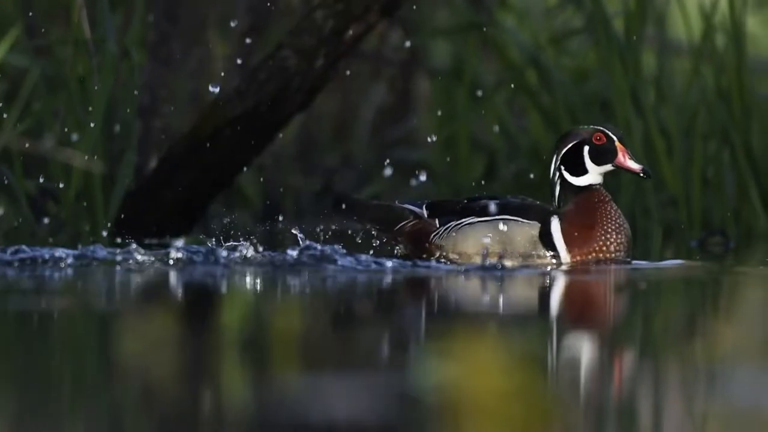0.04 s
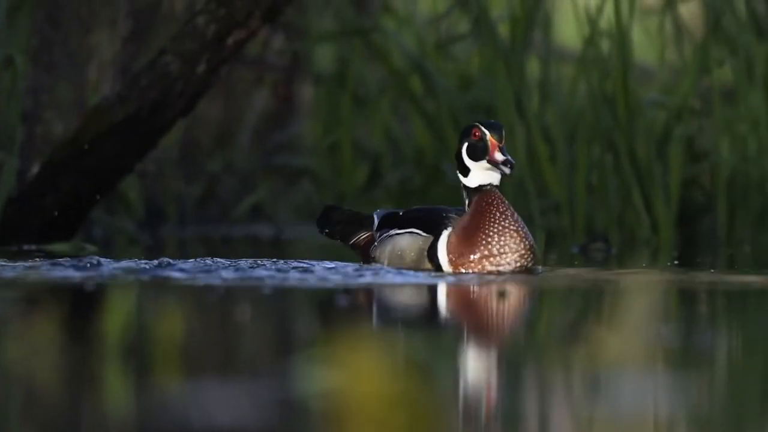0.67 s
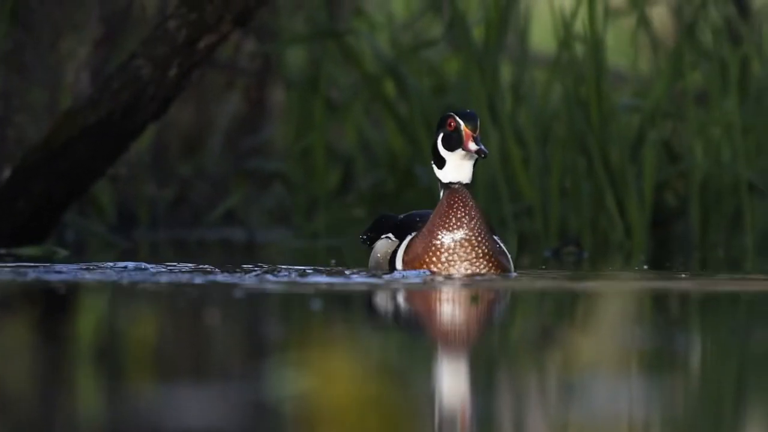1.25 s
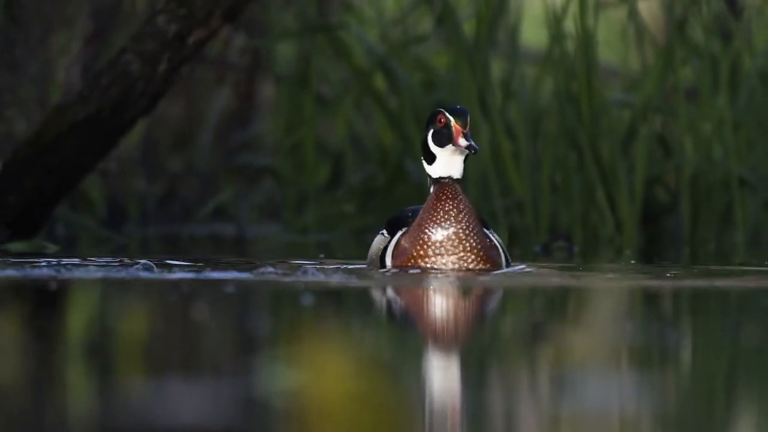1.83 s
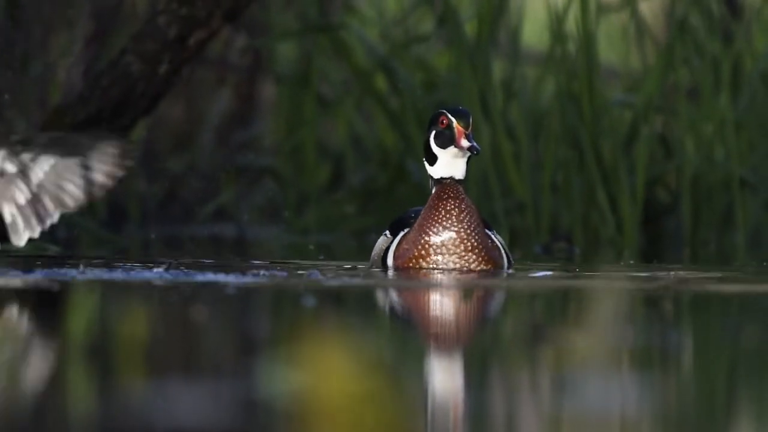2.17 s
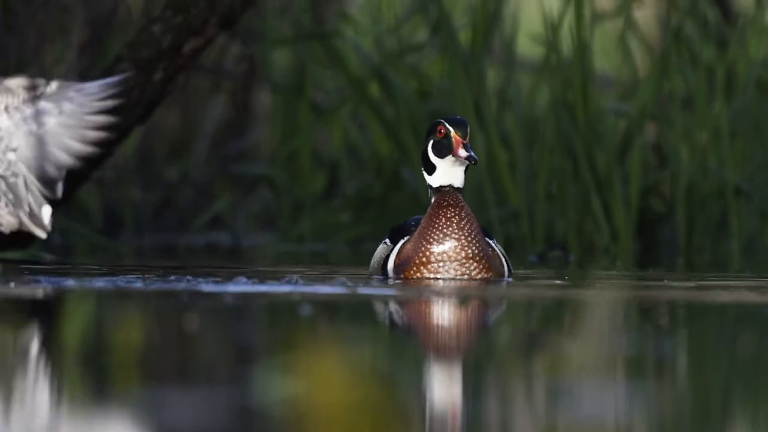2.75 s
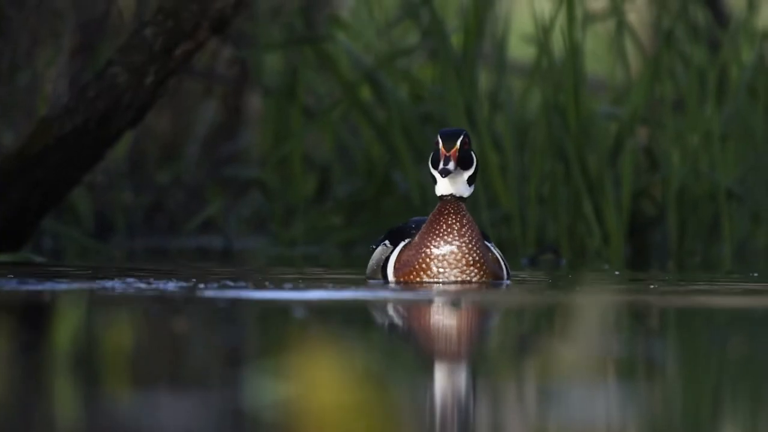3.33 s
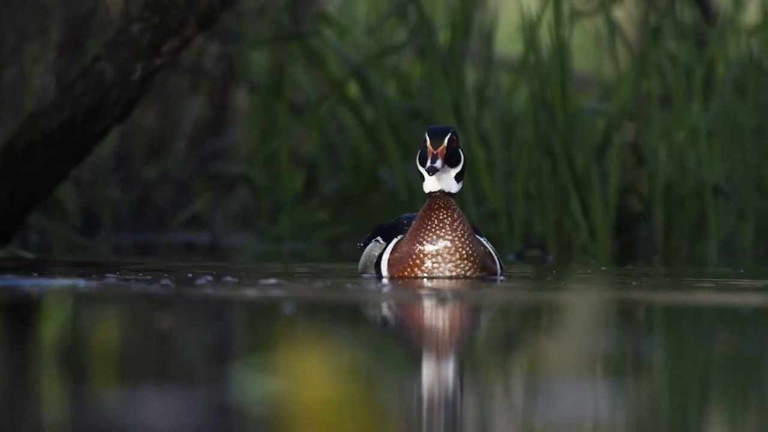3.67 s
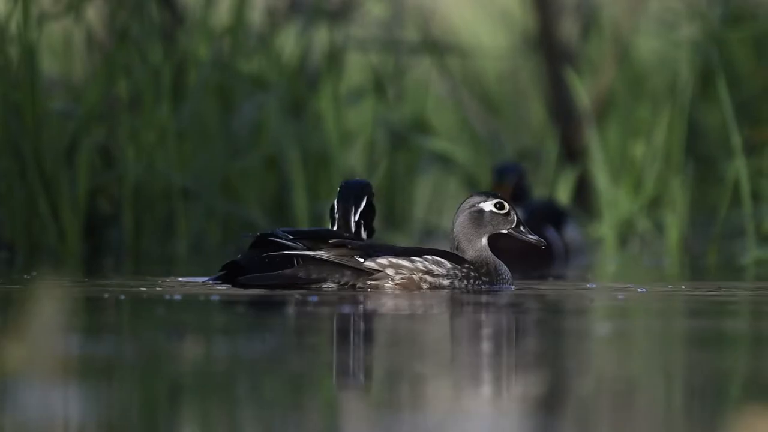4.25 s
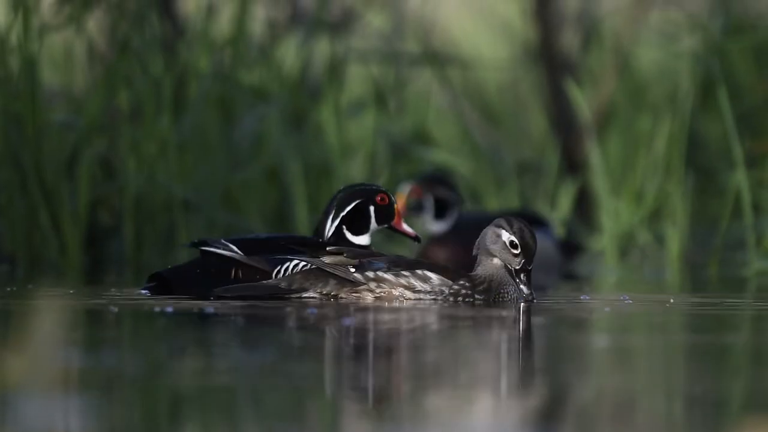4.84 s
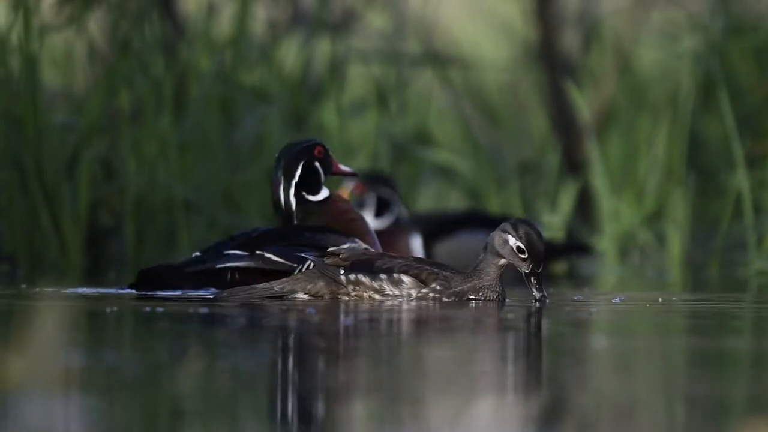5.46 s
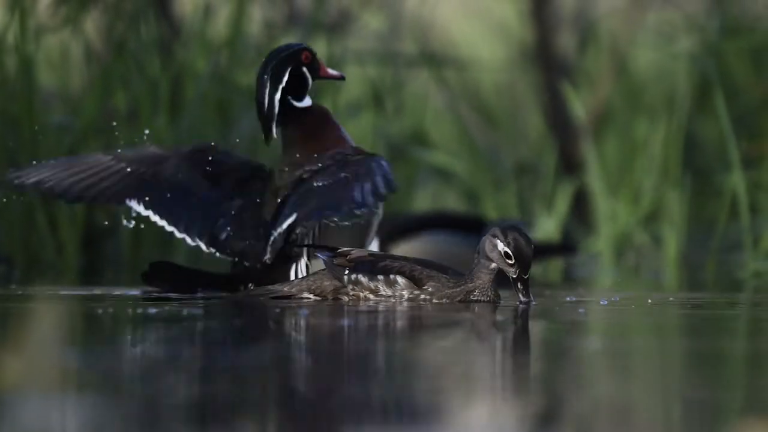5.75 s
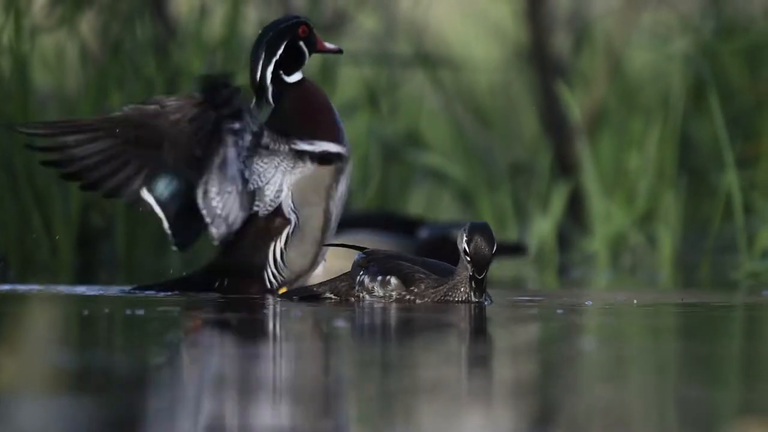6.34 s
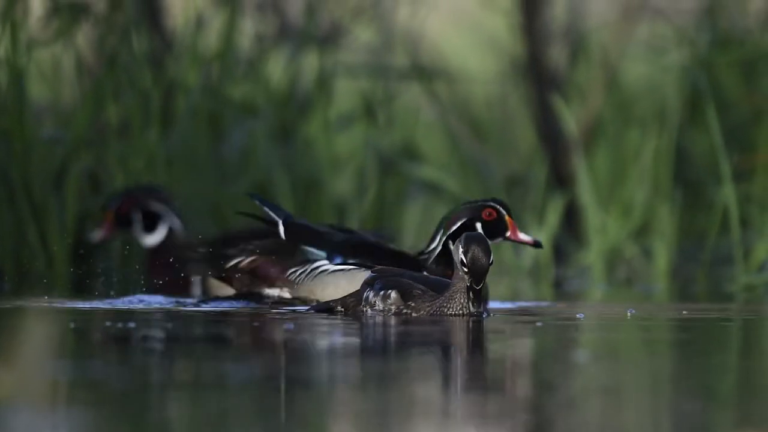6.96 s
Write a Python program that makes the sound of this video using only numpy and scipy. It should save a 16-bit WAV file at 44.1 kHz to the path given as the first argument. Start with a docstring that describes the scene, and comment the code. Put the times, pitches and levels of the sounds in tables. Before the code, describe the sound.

A blackbird whistles and trills harshly while ducks give thin whistles and hoarse clucks over a quiet pond's steady hush.

```python
"""A pond at the edge of a wood: steady hush, faint high recorder whine, trees echoing every call.
A blackbird opens with a whistled phrase and a harsh pulsed trill; drips and soft bumps sound on the
water. Wood ducks join with thin gliding whistles and hoarse clucks, far birds twitter. From 3.3 s the
blackbird repeats its phrase. From 4.6 s a small bird chips over a faint hum. At 7 s a second trill opens."""
import sys
import numpy as np
from scipy import signal
from scipy.fft import rfft, irfft, next_fast_len
from scipy.io import wavfile
from scipy.ndimage import map_coordinates

SR = 44100
rng = np.random.default_rng(int(sys.argv[2]) if len(sys.argv) > 2 else 0)


def generate_wav(signal):
    """Clip the signal to [-1, 1] and save it as 16-bit WAV at the path in sys.argv[1]."""
    frames = np.transpose(np.atleast_2d(signal))
    scaled = np.clip(frames, -1, 1) * 32767
    pcm = np.round(scaled).astype(np.int16)
    wavfile.write(sys.argv[1], SR, pcm)


N = 317520
TIME_S = np.arange(N) / SR

# distant low rush: f/Hz, relative level/dB
RUSH_SPECTRUM = [(15, -49), (25, -27), (43, -6.5), (90, -5), (119, -1), (156, -2.5), (236, -3.5),
                 (280, -7.5), (362, -7), (394, -7), (838, -7.5), (928, -4.5), (1500, -14.5), (1950, -35),
                 (3300, -120)]
# leaves, far birds, microphone hiss: f/Hz, relative level/dB
AIR_SPECTRUM = [(1200, -63), (1550, -5), (1820, -3.5), (1950, 3), (2250, 0), (2450, -4.5), (2700, 1),
                (3300, -5.5), (4500, -8), (6000, -12), (8000, -18.5), (11000, -22.5), (13000, -21),
                (15700, -28)]
# slow drift of that wash: t/s, relative level/dB
AIR_DRIFT = [(0.0, -50), (1.8, -52.5), (7.2, -51)]
# recorder whine: f/Hz, level/dB
WHINE_LINES = [(12021, -86), (12753, -87), (13566, -89), (15655, -54.5)]
# echo decay: f/Hz, T60/s
TREE_DECAY = [(200, .4), (2500, 0.77), (4000, 1), (6000, 0.55), (12000, 0.24)]
# low bumps: t/s, f/Hz, length/s, level/dB
WATER_BUMPS = [(.132, 192, 0.022, -41), (3.057, 85, 0.037, -51), (3.198, 84.4, 0.042, -48.5),
               (3.333, 91.5, 0.049, -44), (3.339, 150, .04, -47)]
# drips and spatter: t/s, length/s, centre/Hz, width/Hz, level/dB
WATER_DRIPS = [(.287, .005, 10040, 6000, -57), (.37, .075, 7200, 3200, -54.5),
               (.615, .055, 6600, 1800, -57), (2.08, .006, 11300, 1800, -54),
               (6.274, 0.011, 9300, 3495, -52), (6.899, 0.0064, 6800, 5000, -52)]
# far birds: from/s, to/s, calls, lowest centre/Hz, highest centre/Hz, mean length/s, mean level/dB
TWITTER_BOUTS = [(1.0, 3.3, 8, 3200, 4600, .025, -57.5), (4.15, 6.15, 34, 3200, 5000, .03, -54),
                 (1.5, 2.5, 7, 6400, 7700, .12, -68), (4.3, 6.3, 11, 5800, 7000, .03, -61.5)]

# rising duck whistles: t/s, lowest f/Hz, relative level/dB
DUCK_RISES = [(2.668, 3870, -48), (3.238, 3080, -49.5), (3.565, 3300, -52), (4.578, 3020, -52.5)]
# falling whistles: t/s, length/s, start/Hz, end/Hz, relative level/dB
DUCK_FALLS = [(.646, .13, 4100, 3600, -51.5), (1.894, .069, 3550, 3050, -52.5),
              (2.473, .029, 5600, 3150, -49), (2.979, .063, 6150, 4500, -51),
              (3.222, .032, 4600, 3050, -53), (4.43, .025, 5000, 3380, -52),
              (5.032, .028, 4300, 3800, -44.5), (5.176, .044, 4200, 3600, -44),
              (5.413, .029, 4750, 4420, -44), (5.414, .032, 5700, 5100, -40.5),
              (5.497, .032, 4200, 3500, -41.5), (5.668, .025, 3700, 3050, -44),
              (5.76, .043, 4310, 3380, -46), (6.048, .044, 5190, 3750, -47),
              (6.59, .033, 4650, 4200, -41.5)]
# arching whistles: t/s, length/s, top/Hz, relative level/dB
DUCK_ARCHES = [(2.087, .034, 4600, -52), (2.262, .084, 5900, -49.3), (4.922, .15, 4170, -50.5),
               (5.645, .065, 5750, -55), (5.787, .07, 5700, -53)]
# held whistles: t/s, length/s, f/Hz, relative level/dB; the note at 3.953 s is the blackbird's upsweep held on,
# not a duck
DUCK_PIPES = [(.86, .08, 1290, -57), (1.055, .036, 5800, -57), (1.2, .045, 4860, -50.5),
              (2.852, .021, 5200, -52), (3.025, .08, 1740, -41.5), (3.11, .13, 2880, -55),
              (3.953, .027, 3600, -35), (4.101, .17, 5310, -58), (4.913, .028, 5480, -47),
              (5.226, .1, 3915, -38.3), (5.607, .052, 3220, -46), (5.733, .035, 3060, -45.5),
              (6.117, .025, 6600, -55), (6.284, .051, 3585, -42), (6.403, .04, 1180, -49.5),
              (6.467, .035, 3260, -38.5), (6.99, .014, 1530, -46)]
# hoarse clucks: t/s, length/s, level/dB
DUCK_CLUCKS = [(.836, .018, -44.5), (2.939, .009, -38), (4.106, .029, -39), (4.325, .018, -41),
               (4.751, .026, -45.5)]
# buzzes: t/s, centre/Hz, width/Hz, level/dB
DUCK_BUZZES = [(6.345, 3560, 700, -43), (6.805, 1910, 300, -45.5), (6.811, 3580, 800, -40.5)]

# rasps opening a trill: t in trill/s, length/s, centre/Hz, width/Hz, pulse rate/Hz, level/dB
OPENING_RASPS = [(.004, .049, 4300, 650, 160, -37.3), (.008, .044, 2930, 600, 287, -40.5),
                 (.087, .05, 4060, 350, 195, -36)]
# clear notes among them: t in trill/s, length/s, f/Hz, level/dB
OPENING_PIPES = [(.007, .047, 3295, -39), (.1, .058, 3635, -36)]
# blackbird throat response: f/Hz, gain/dB
THROAT_RESPONSE = [(1500, -50), (2100, -27), (2480, -20), (2770, 0), (3040, -1), (3140, -1), (3370, -5),
                   (3460, 1), (3700, -14), (4000, -13), (4300, -24), (4620, -18), (4900, -11), (5250, -34),
                   (7000, -50)]
# noise in the trill: f/Hz, relative level/dB
HOARSE_SPECTRUM = [(1400, -35), (1900, -10.5), (2400, -11), (2800, 5.5), (3500, -1.5), (3900, -14),
                   (4700, -8), (5400, -20), (7000, -47)]
# upper voice of the trill: t in trill/s, f/Hz
SHRILL_PITCH = [(0.127, 6010), (0.185, 5595), (0.235, 5609), (0.327, 5461), (0.449, 5522), (0.473, 5600),
                (0.495, 5431), (0.535, 5429)]
# blackbird phrases: low note t/s, its shift/Hz, its gain/dB, gain of the rest/dB, falling notes' gain/dB
SONG_PHRASES = [(-.098, 0, -30, -26.7, -32.5), (3.342, -42, -32.7, -31, -41.5),
                (3.722, 0, -27.8, -29, -36.5), (5.778, -46, -31.3, -28.5, -37),
                (6.164, -12, -28.5, -28, -32), (6.551, 0, -28, -27.5, -29.5), (6.957, 0, -27.8, -28, -30.5)]
# five note contours: t in note/s, f/Hz, relative level/dB
LEAD_CONTOUR = [(0, 3694, -4), (.009, 3484, -8), (.019, 3220, -1), (.028, 3060, -20)]
LOW_CONTOUR = [(0, 2743, -16), (.007, 2699, -3.5), (.022, 2650, 0.5), (.034, 2630, -7), (.055, 2625, -11.5),
               (.075, 2690, -28)]
DROP_CONTOUR = [(0, 3390, -10), (.008, 3206, 2), (.017, 2965, 1), (.028, 2870, 2)]
UPSWEEP_CONTOUR = [(0, 2230, -12.5), (.008, 2446, -4), (.022, 3110, -1), (.029, 3440, -7.5),
                   (.04, 3658, -7.5), (.085, 3635, -16.5), (.11, 3600, -6)]
UNDERTONE_CONTOUR = [(0, 3200, -24), (.007, 2750, -12.5), (.012, 2050, -17), (.018, 1950, -21)]

TRILL_STARTS_S = 0, 7.054
ECHO_CUT_S, BAND_LIMIT_HZ = 4.088, 15760


def amp(db):
    """Decibels to gain."""
    return 10 ** (np.asarray(db) / 20)


def unit(x):
    """Scale to rms 1."""
    return x / np.sqrt(np.mean(x ** 2) + 1e-20)


def along(points, hz):
    """Read (f/Hz, value) points on a log axis."""
    point_hz, values = np.transpose(points)
    return np.interp(np.log(hz + 1), np.log(point_hz + 1), values)


def curves(rows):
    """Per-sample curve of each column, first row's time to last."""
    t_s, *columns = np.transpose(rows)
    return [np.interp(np.arange(t_s[0], t_s[-1], 1 / SR), t_s, column) for column in columns]


def wobble(rate_hz, size):
    """Smooth random curve, knots at rate_hz."""
    knots = rng.standard_normal(int(size * rate_hz / SR) + 4)
    return map_coordinates(knots, [np.arange(size) * rate_hz / SR])


def filtered(x, gain):
    """Apply gain(f/Hz) to x."""
    size = next_fast_len(len(x) + 8192)
    return irfft(rfft(x, size) * gain(np.fft.rfftfreq(size, 1 / SR)), size)[:len(x)]


def band(x, centre_hz, width_hz):
    """One steep-sided resonance."""
    return filtered(x, lambda hz: 1 / (1 + ((hz - centre_hz) / (.6 * width_hz)) ** 4))


def noise(spectrum, size):
    """Coloured noise, rms 1."""
    return unit(filtered(rng.standard_normal(size), lambda hz: amp(along(spectrum, hz))))


def phase(hz):
    """Running phase/rad of a frequency curve."""
    return 2 * np.pi * np.cumsum(hz) / SR


def swell(length_s, power):
    """Progress u (0-1) and a rounded envelope, rms 1."""
    u = np.linspace(0, 1, max(int(length_s * SR), 16))
    return u, unit(np.abs(np.sin(np.pi * u)) ** power)


def sustain(size, attack_s, fade_db_per_s, release_s):
    """Envelope: attack, steady fade, release."""
    t_s = np.arange(size) / SR
    attack = np.clip(t_s / attack_s, 0, 1)
    release = np.clip((t_s[-1] - t_s) / release_s, 0, 1)
    return attack * amp(-fade_db_per_s * t_s) * release


def add(track, t_s, x):
    """Mix x into the track at t_s."""
    i = round(t_s * SR)
    x, i = x[max(-i, 0):], max(i, 0)
    track[i:i + len(x)] += x[:max(N - i, 0)]


def ambience():
    """Distant low rush, brighter wash from the wood, thin recorder whine."""
    rush = amp(-51 + .44 * wobble(3.06, N)) * noise(RUSH_SPECTRUM, N)
    air_db = np.interp(TIME_S, *np.transpose(AIR_DRIFT)) + 5.5 + .43 * wobble(8, N)
    air = amp(air_db) * noise(AIR_SPECTRUM, N)
    whine = sum(amp(db) * unit(np.sin(2 * np.pi * hz * TIME_S)) for hz, db in WHINE_LINES)
    return rush + air + whine


def hum(start_s=4.3, level_db=-62):
    """Far drone: narrow low noise swells and fades."""
    out = np.zeros(N)
    u, envelope = swell(length_s=1.5, power=1)
    drone = unit(band(rng.standard_normal(len(u)), centre_hz=160, width_hz=22))
    add(out, start_s, amp(level_db) * envelope * drone)
    return out


def tree_echo(x, build_s=.0074):
    """Diffuse echo from the trunks; longest near 4 kHz."""
    hz, t_s, spectra = signal.stft(rng.standard_normal(SR), SR, nperseg=256)
    decay = amp(-60 * t_s / along(TREE_DECAY, hz)[:, None])
    tail = signal.istft(spectra * decay, SR, nperseg=256)[1]
    tail *= 1 - np.exp(-np.arange(len(tail)) / SR / build_s)
    return signal.fftconvolve(x, tail / np.linalg.norm(tail))[:N]


def twig_scatter(x):
    """Weak copies off nearby twigs, within 25 ms; fast glides flutter."""
    delays_s = np.arange(6) * .0037 + rng.uniform(.003, .006, 6)
    out = np.pad(x, (0, SR // 30))
    for k, delay_s in enumerate(delays_s):
        add(out, delay_s, amp(-10 - 1.8 * k) * x)
    return out


def bumps():
    """Dull pushes on the water, a few cycles each."""
    out = np.zeros(N)
    for t_s, hz, length_s, db in WATER_BUMPS:
        u, envelope = swell(length_s, power=1.5)
        unsteady_hz = hz * (1 + .19 * wobble(86, len(u)))
        add(out, t_s, amp(db) * unit(envelope * np.sin(phase(unsteady_hz))))
    return out


def drips():
    """Small drops fizz briefly on the surface."""
    out = np.zeros(N)
    for t_s, length_s, centre_hz, width_hz, db in WATER_DRIPS:
        u, envelope = swell(length_s, power=1)
        spatter = rng.standard_normal(len(u)) * amp(4 * wobble(402, len(u)))
        add(out, t_s, amp(db) * unit(envelope * band(spatter, centre_hz, width_hz)))
    return out


def tone(hz, jitter, flutter_db, octave_db):
    """Bird voice, rms 1: unsteady sine plus weak octave."""
    angle = phase(hz * (1 + jitter * wobble(161, len(hz))))
    wave = np.sin(angle) + amp(octave_db) * np.sin(2 * angle)
    return unit(wave * amp(flutter_db * wobble(130, len(hz))))


def twitter():
    """Far birds slur short notes downwards at random times."""
    out = np.zeros(N)
    for from_s, to_s, count, low_hz, high_hz, length_s, db in TWITTER_BOUTS:
        for when, pitch, extent, loudness in rng.random((count, 4)):
            u, envelope = swell(length_s * (.5 + extent), power=.8)
            hz = low_hz + pitch * (high_hz - low_hz) + 900 * (1 + extent) * (.5 - u)
            call = envelope * tone(hz, jitter=.0065, flutter_db=1, octave_db=-30)
            add(out, from_s + when * (to_s - from_s), amp(db + 6 * (loudness - .5)) * call)
    return out


def chips(start_s=4.558, count=17, gap_s=.0711, gap_growth_s=.00082):
    """Small bird: two-voiced chips flick up and down; the run slows, swells and sinks in pitch."""
    top_hz, sag_hz_per_s, swell_s = 5800, 480, .36
    out = np.zeros(N)
    u, envelope = swell(length_s=.0149, power=.8)
    flick = 1 - .28 * np.abs(2 * u - 1)
    for k in range(count):
        t_s = k * gap_s + gap_growth_s * k * k / 2
        db = -41.8 - 12 * np.exp(-t_s / swell_s)
        hz = (top_hz - sag_hz_per_s * t_s) * flick
        lower = tone(hz, jitter=.035, flutter_db=3.5, octave_db=-30)
        upper = amp(-13.5) * tone(1.28 * hz, jitter=.036, flutter_db=3, octave_db=-28)
        add(out, start_s + t_s, amp(db) * twig_scatter(envelope * (lower + upper)))
    return out


def whistle(length_s, pitch_hz):
    """Rounded whistle; pitch_hz is a function of progress 0-1."""
    u, envelope = swell(length_s, power=.46)
    return envelope * tone(pitch_hz(u), jitter=.0032, flutter_db=2, octave_db=-33)


def pipe(length_s, hz, climb=.018):
    """Held whistle; pitch creeps up."""
    return whistle(length_s, lambda u: hz * (1 + climb * (u - .5)))


def rasp(length_s, centre_hz, width_hz, rate_hz):
    """Uneven pulses and turbulence ring one broad throat resonance."""
    u, envelope = swell(length_s, power=.53)
    cycles = phase(rate_hz * (1 + .03 * wobble(200, len(u)))) / (2 * np.pi)
    pulses = np.diff(np.floor(cycles + .5), prepend=0)
    source = unit(pulses) + .61 * rng.standard_normal(len(u))
    return unit(envelope * band(source, centre_hz, width_hz))


def duck_whistles():
    """Four shapes: dip then rise, flattening fall, arch with a softer top, held note."""
    rise_s, rise_ratio, dip_share = .115, 1.36, .25
    fall_ease, arch_base_hz, arch_top_db = .35, 3150, -6
    rise = lambda u: rise_ratio ** (np.sin(np.pi / 2 * (u - dip_share) / (1 - dip_share)) ** 2)
    fall = lambda u: u + fall_ease * u * (1 - u)
    arch = lambda u: np.sin(np.pi * u) ** 2
    out = np.zeros(N)
    for t_s, hz, db in DUCK_RISES:
        add(out, t_s, amp(db) * whistle(rise_s, lambda u: hz * rise(u)))
    for t_s, length_s, start_hz, end_hz, db in DUCK_FALLS:
        add(out, t_s, amp(db) * whistle(length_s, lambda u: start_hz + (end_hz - start_hz) * fall(u)))
    for t_s, length_s, top_hz, db in DUCK_ARCHES:
        call = whistle(length_s, lambda u: arch_base_hz + (top_hz - arch_base_hz) * arch(u))
        soft_top = amp(arch_top_db * arch(np.linspace(0, 1, len(call))))
        add(out, t_s, amp(db) * unit(call * soft_top))
    for t_s, length_s, hz, db in DUCK_PIPES:
        add(out, t_s, amp(db) * pipe(length_s, hz))
    return out


def duck_rasps():
    """Short clucks on one resonance; longer, slower buzzes."""
    out = np.zeros(N)
    for t_s, length_s, db in DUCK_CLUCKS:
        add(out, t_s, amp(db) * rasp(length_s, centre_hz=2540, width_hz=850, rate_hz=260))
    for t_s, centre_hz, width_hz, db in DUCK_BUZZES:
        add(out, t_s, amp(db) * rasp(.107, centre_hz, width_hz, rate_hz=122))
    return out


def trill_openings():
    """Blackbird: the same rasps and clear notes open each trill."""
    out = np.zeros(N)
    for start_s in TRILL_STARTS_S:
        for t_s, length_s, centre_hz, width_hz, rate_hz, db in OPENING_RASPS:
            add(out, start_s + t_s, amp(db) * rasp(length_s, centre_hz, width_hz, rate_hz))
        for t_s, length_s, hz, db in OPENING_PIPES:
            add(out, start_s + t_s, amp(db) * pipe(length_s, hz))
    return out


def blackbird_trills(delay_s=.095, length_s=.465, settle_s=.12, noise_share=.23):
    """Buzz: fast pulses through the throat, partly gated noise. Shrill: a clean voice above it."""
    buzz, shrill = np.zeros(N), np.zeros(N)
    size = int(length_s * SR)
    rate_hz = 304.5 + 13 * np.exp(-TIME_S[:size] / settle_s)
    buzz_gain = amp(-28.9) * sustain(size, attack_s=.017, fade_db_per_s=19, release_s=.04)
    shrill_hz, = curves(SHRILL_PITCH)
    shrill_gain = amp(-30.2) * sustain(len(shrill_hz), attack_s=.03, fade_db_per_s=17, release_s=.03)
    for start_s in TRILL_STARTS_S:
        angle = phase(rate_hz * (1 + .0017 * wobble(119.4, size)))
        harmonics = np.zeros(size)
        for k in range(6, 20):
            db = along(THROAT_RESPONSE, k * rate_hz) + wobble(45, size)
            harmonics += amp(db) * np.sin(k * angle + rng.uniform(0, 2 * np.pi))
        gate = 1 + .82 * np.cos(angle)
        hoarse = noise(HOARSE_SPECTRUM, size) * gate * amp(2.7 * wobble(200, size))
        lower = np.sqrt(1 - noise_share) * unit(harmonics) + np.sqrt(noise_share) * unit(hoarse)
        add(buzz, start_s + delay_s, buzz_gain * amp(1.2 * wobble(70, size)) * lower)
        upper = tone(shrill_hz, jitter=.0008, flutter_db=.9, octave_db=-39)
        add(shrill, start_s + SHRILL_PITCH[0][0], shrill_gain * upper)
    return buzz, shrill


def note(contour, jitter, flutter_db):
    """One blackbird note from its pitch and level contour."""
    hz, db = curves(contour)
    return amp(db) * tone(hz, jitter, flutter_db, octave_db=-39)


def blackbird_phrases():
    """Lead-in, low note, drop, upsweep, faint high note; one side of the syrinx falls as one rises."""
    out = np.zeros(N)
    for t_s, shift_hz, low_db, rest_db, fall_db in SONG_PHRASES:
        lead = twig_scatter(note(LEAD_CONTOUR, jitter=.011, flutter_db=.5))
        low = note(np.array(LOW_CONTOUR) + [0, shift_hz, 0], jitter=.0012, flutter_db=.6)
        drop = twig_scatter(note(DROP_CONTOUR, jitter=.011, flutter_db=2))
        upsweep = twig_scatter(note(UPSWEEP_CONTOUR, jitter=.0037, flutter_db=1.5))
        undertone = note(UNDERTONE_CONTOUR, jitter=.011, flutter_db=5)
        add(out, t_s - .031, amp(fall_db - 1.5) * lead)
        add(out, t_s, amp(low_db - 1) * low)
        add(out, t_s + .093, amp(fall_db - 4.5) * drop)
        add(out, t_s + .152, amp(rest_db - 2) * upsweep)
        add(out, t_s + .167, amp(rest_db - 1) * undertone)
        add(out, t_s + .314, amp(rest_db - 18.5) * pipe(length_s=.042, hz=4240))
    return out


def scene():
    """Mono mix. The song comes from the trees, so it echoes more than the birds on the water."""
    song = blackbird_phrases()
    buzz, shrill = blackbird_trills()
    near = amp(1) * duck_whistles() + chips() + duck_rasps() + trill_openings()
    far = twitter()
    send = amp(-5) * song + amp(-12) * buzz + amp(-16) * shrill + amp(-10) * near + amp(-2.5) * far
    early = np.clip((ECHO_CUT_S - TIME_S) / .004, 0, 1)  # echo of earlier calls stops short
    echo = early * tree_echo(early * send) + tree_echo((1 - early) * send)
    birds = song + buzz + shrill + near + far
    return (birds + echo + drips() + bumps() + ambience() + hum())[None]


def record(dry):
    """Brick-wall low-pass at the recorder's band limit."""
    return filtered(dry[0], lambda hz: hz < BAND_LIMIT_HZ)[None]


dry = scene()
out = record(dry)
generate_wav(out)
```